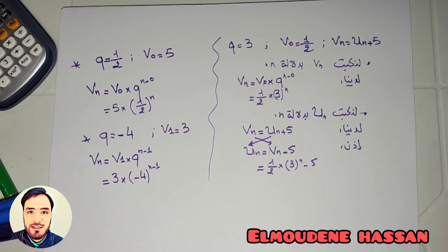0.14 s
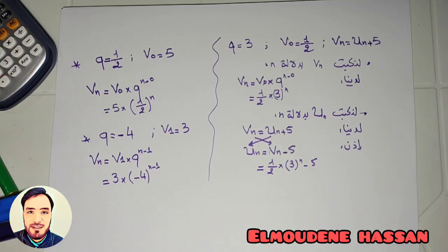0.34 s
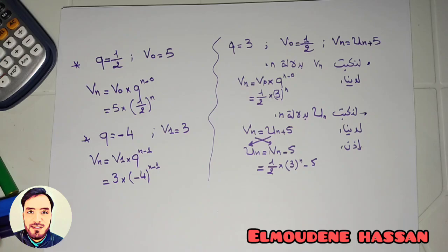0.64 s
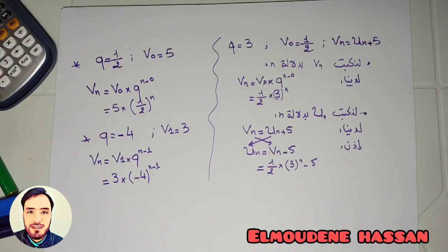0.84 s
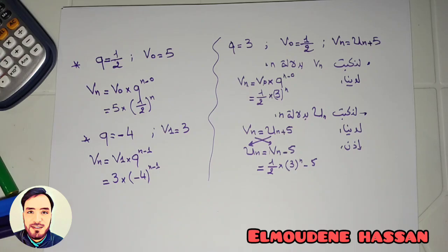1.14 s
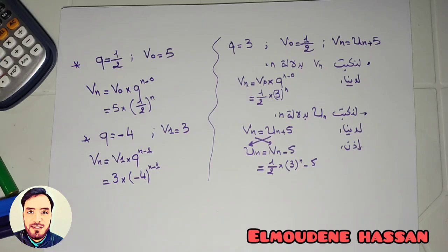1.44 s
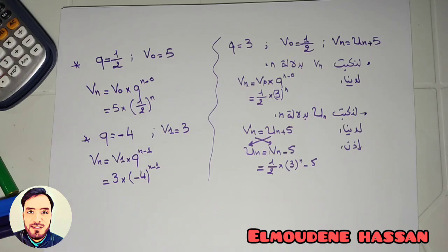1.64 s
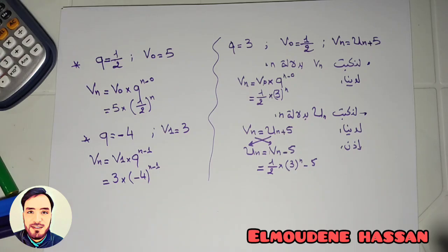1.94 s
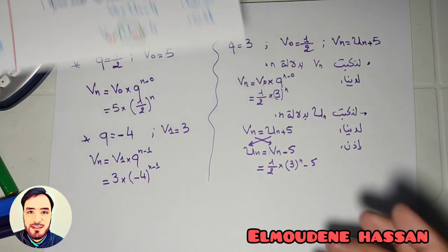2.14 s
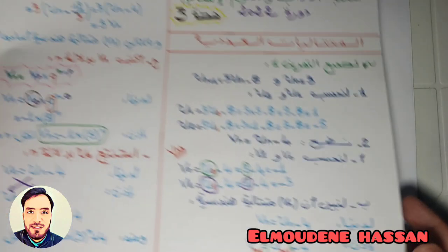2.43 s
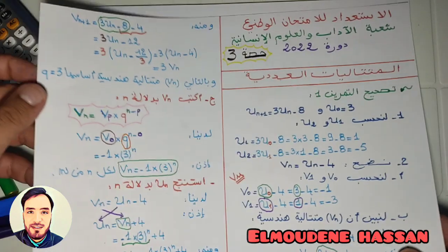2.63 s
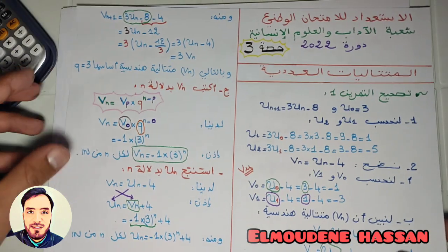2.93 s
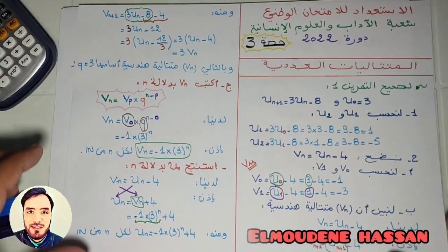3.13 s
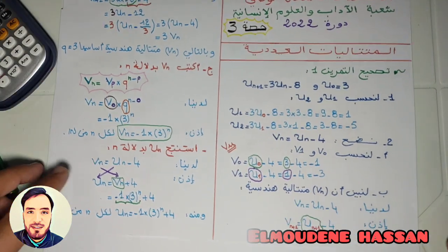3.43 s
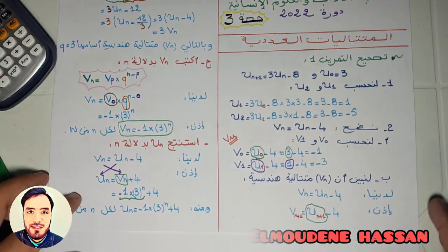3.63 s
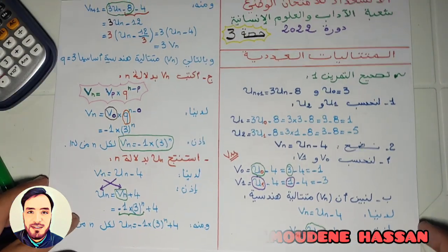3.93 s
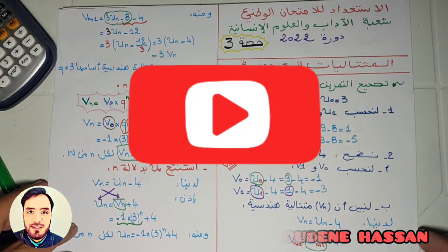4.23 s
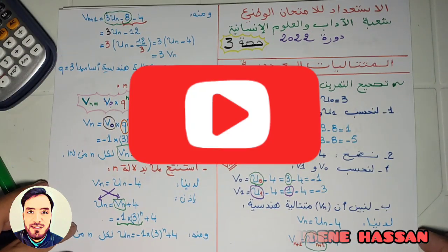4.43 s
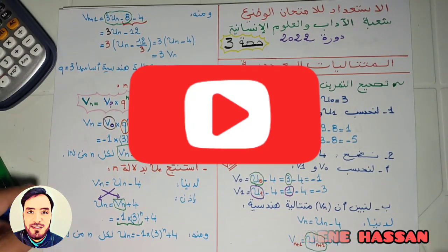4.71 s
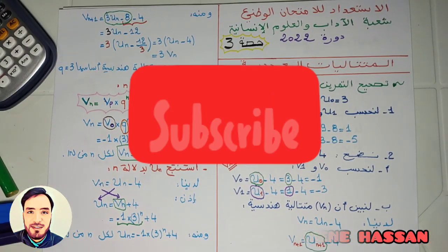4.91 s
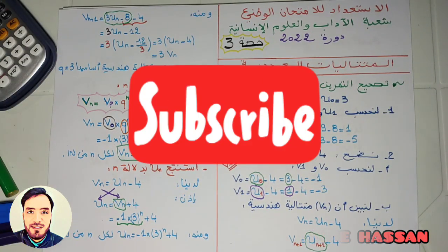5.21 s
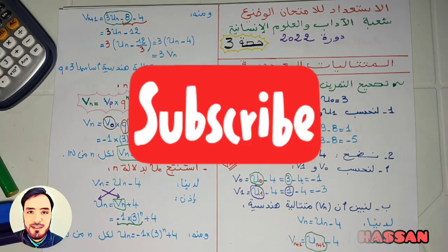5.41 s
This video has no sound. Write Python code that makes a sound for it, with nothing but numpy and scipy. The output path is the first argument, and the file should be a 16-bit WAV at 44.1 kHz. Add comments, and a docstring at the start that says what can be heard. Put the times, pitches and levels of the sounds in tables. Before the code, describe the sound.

In a small quiet room, a brief paper crinkle and soft desk bumps lead into a pen put down with two bright, hard clacks. After a near pause, a sheet is drawn off a pile in short crisp hisses, laid down and smoothed, with scattered ticks and light knocks. Close stereo phone microphone, faint rumble and hiss.

```python
"""Paper slides with a short hiss and crinkle in a small quiet room; then a pen is put down with two sharp clacks.
Hands bump the desk; a sheet is drawn off a pile, laid down and smoothed, its edges ticking.
Sliding paper is grainy coloured noise plus random pitched pops; its bending is slowly uneven low noise.
Ticks and clacks are flat noise bursts through resonances; desk blows are sums of decaying sine modes.
Echoes are decaying noise, drier for paper; a faint rumble and hiss run throughout."""
import sys
import numpy as np
from scipy import signal
from scipy.fft import rfft, irfft
from scipy.io import wavfile

SR = 44100
rng = np.random.default_rng(int(sys.argv[2]) if len(sys.argv) > 2 else 0)


def waveform_to_disk(signal):
    """Save audio, clipped to [-1, 1], as 16-bit WAV at the path in sys.argv[1]."""
    frames = np.transpose(np.atleast_2d(signal))
    scaled = np.clip(frames, -1, 1) * 32767
    samples = np.round(scaled).astype(np.int16)
    wavfile.write(sys.argv[1], SR, samples)


N = 245321
T_S = np.arange(N) / SR
BLOW_T_S = T_S[:4096]

# room background spectrum: f/Hz, relative level/dB
QUIET_COLOUR = [(15, 3.5), (25, -2.5), (42, -3.5), (60, -10), (100, -18.5), (190, -13), (457, -24),
                (555, -20), (889, -27.5), (3970, -41), (7510, -39.5), (8860, -39.5), (10000, -49.5),
                (12300, -48.5), (13400, -76)]
QUIET_REF_DB = -58.5  # before the gains of rumble and hiss

# paper sliding on paper: start/s, length/s, relative level/dB, swell over stroke/dB,
# sheet face re hiss/dB, lightness of touch/dB (scaled before use)
STROKES = [(0.0, 0.02, -57.5, -18.5, 18.5, -15), (0.037, 0.074, -68.5, -2.5, -12, -3),
           (1.001, 0.16, -72, -3, -10, -0.5), (1.151, 0.033, -60.5, 0, 2, 4),
           (1.197, 0.084, -62, -13, -5, -5), (1.513, .13, -53.5, 0.5, -4, 5),
           (1.656, 0.082, -57.5, 3, -3.5, -4), (1.775, 0.06, -61.5, 12, -7.5, -1),
           (1.825, 0.097, -48, -8, 0, 2), (1.914, 0.052, -50, 6.5, -4, 1.5),
           (2.561, 0.046, -48.5, -0.5, -7, -4), (2.613, 0.026, -52, 1, -3.5, -14),
           (2.661, 0.067, -59.5, 0.5, 3.5, -20), (2.737, 0.12, -55.5, -11, -7.5, -12),
           (2.847, 0.094, -58, -1, -4.5, -13.5), (3.038, 0.2, -65, -2.5, -6.5, -12.5),
           (3.259, 0.074, -72.5, 8.5, -7.5, -5.5), (3.502, 0.028, -70, 7, -4.5, 1),
           (3.674, 0.16, -63, 3, -15, 3.5), (3.879, 0.2, -67.5, 4, -9, -2),
           (4.237, 0.023, -71.5, 2.5, -4.5, 0.5), (5.179, 0.15, -52.5, -9, -9, 7.5),
           (5.36, 0.1, -68, 3, -6, 3)]
STROKE_ATTACK_S, STROKE_RELEASE_S = 0.02, 0.014
# sheet bends and flaps: start/s, length/s, relative level/dB, swell over flex/dB
FLEXES = [(0.0, 0.21, -50.5, -25), (0.201, 0.21, -61.5, 2), (1.168, 0.16, -61.5, -11.5),
          (1.537, 0.32, -70, 3), (1.828, 0.15, -49.5, -9), (2.009, 0.054, -57, -3),
          (2.552, 0.21, -63.5, -13), (5.16, 0.17, -67.5, -3.5)]
FLEX_ATTACK_S, FLEX_RELEASE_S = 0.02, 0.027
# fibre hiss spectrum: f/Hz, relative level/dB
HISS_COLOUR = [(2500, -21), (5000, -11.5), (6500, -3), (7700, 1.5), (9000, -3.5), (10000, -26),
               (13000, -28.5), (15500, -33.5)]
# light skim spectrum: f/Hz, relative level/dB
SKIM_COLOUR = [(5000, -22), (8500, 2), (11500, 3.5), (13000, -6), (15500, -2)]
# heavy drag spectrum: f/Hz, relative level/dB
DRAG_COLOUR = [(2500, -19.5), (4500, -6), (6000, -4), (7000, 1.5), (9500, -28.5)]
# sheet face spectrum: f/Hz, relative level/dB
FACE_COLOUR = [(400, -19), (1100, -0.5), (1700, -2.5), (2400, 1.5), (3300, 0.5), (4600, -2), (6500, -14),
               (10000, -35)]
# sheet bending spectrum: f/Hz, relative level/dB
BEND_COLOUR = [(90, -23), (190, -2), (320, -3.5), (430, -4), (650, 1), (900, -3), (1400, -10.5),
               (2500, -25), (5000, -47)]

# paper edges and nails, plus the ring of the desk knock at 2.25 s (row 2.2503 s): t/s, relative level/dB, #
# centre f/Hz, width per filter pass/Hz, contact time constant/s, left minus right/dB
TICKS = [(0.0165, -52.5, 7600, 2980, 0.00071, -7.5), (0.2127, -48, 3600, 8200, 0.00094, -3),
         (0.936, -50.5, 4800, 9000, 0.00063, 4), (1.1742, -44, 8000, 3950, 0.00045, -2),
         (2.2503, -45.5, 863, 450, 0.0008, -0.5), (2.58, -43, 7460, 3930, 0.001, -5),
         (2.7515, -46.5, 6840, 3040, 0.0022, -20), (2.9945, -53, 2380, 2250, 0.00089, 4),
         (3.4764, -58, 2580, 596, 0.00031, -5), (3.942, -48, 7500, 4030, 0.00092, -20),
         (3.944, -56, 2150, 2520, 0.002, -1), (4.668, -61, 2060, 2200, 0.004, -2),
         (4.6687, -54, 7380, 1985, 0.00057, -11.5), (4.9992, -64, 3160, 494, 0.00083, -10),
         (5.1337, -45.5, 8430, 3060, 0.0016, -4.5)]

# hands and sheets landing on the desk: t/s, level/dB, softness corner f/Hz, low cut f/Hz, left minus right/dB
KNOCKS = [(.019, -46, 2220, 300, 3), (.217, -50, 1810, 203, -2), (0.272, -47.5, 560, 278, 3),
          (0.339, -48, 1800, 200, 4), (0.625, -49, 1610, 249, 13), (1.1646, -39, 550, 238, 5.5),
          (1.175, -46.5, 2180, 800, 4), (1.419, -53.5, 552, 200, 7.5), (2.25, -50.5, 950, 1003, -6),
          (2.322, -53, 900, 889, 0.5), (2.5126, -59, 1480, 1026, -3), (2.589, -50, 1800, 1010, 15),
          (2.631, -53, 2100, 1110, 24), (2.676, -53.5, 1190, 895, -2), (2.9966, -60, 2400, 397, 10),
          (3.9455, -48.5, 3000, 262, 6), (4.671, -48, 2190, 280.5, 8), (5.241, -55, 163, 140, -1),
          (5.308, -57, 160, 140, 10)]
# desk top modes, nominal: f/Hz, relative level/dB, t60/s
DESK_MODES = [(165, -18, 0.24), (255.5, -16.5, .03), (352, 3.5, 0.018), (404.4, 1, 0.021),
              (567.3, 0, 0.022), (719.3, -2.5, .03), (863, -2.5, 0.028), (1139, -1.5, 0.029),
              (1270, -2.5, 0.014), (1700, -9, 0.027), (2336, -2, .008)]
# desk knock under each clack; level re the clack's table level
PEN_KNOCK_LAG_S, PEN_KNOCK_DB = 0.003, -14.5
PEN_SOFT_HZ, PEN_LOW_CUT_HZ, PEN_KNOCK_PAN_DB = 1550, 200.3, 7

# pen put down and bouncing: t/s, relative level/dB, contact time constant/s, relative tip ring/dB,
# barrel ring/dB, tip left minus right before a common offset/dB
CLACKS = [(0.336, -38.5, 0.00057, 1, -5, -14), (.3712, -16, 0.00065, 2, -5.5, -1),
          (0.391, -29.5, 0.00042, -5.5, -1, -2.5), (0.4237, -19.5, 0.00053, -2.5, -4.5, 3),
          (0.618, -49.5, 0.00074, 11.5, -7.5, -12.5)]
# clack spectrum: f/Hz, relative level/dB
CLACK_COLOUR = [(120, -17), (320, 0), (600, -9.5), (900, -1.5), (1180, 6.5), (1650, -4.5), (2500, -3.5),
                (4800, -3), (8600, -7.5), (9900, -15), (15000, -35)]
# pen barrel resonances: f/Hz, width/Hz, relative level/dB
BARREL_MODES = [(2138, 385, 3.5), (2750, 220, 7), (3580, 400, -4.5)]
# pen tip resonances: f/Hz, width/Hz, relative level/dB
TIP_MODES = [(6360, 660, 3), (7430, 340, 6.5), (7970, 1800, 0)]

# room decay: f/Hz, t60/s
ROOM_T60 = [(150, 0.28), (500, 0.3451), (1200, 0.39), (3000, 0.42), (8000, 0.34), (14000, 0.2)]
# echo spectrum: f/Hz, relative level/dB
ECHO_COLOUR = [(80, -18.5), (125, -14), (170, -2), (250, 1), (360, -2.5), (500, 2), (1000, -2.5),
               (2700, -2), (5500, -7.5), (8500, -3.5), (10500, -12)]
TOP_HZ = 15400


def undb(db):
    """Decibels to gain."""
    return np.exp(np.asarray(db) * np.log(10) / 20)


def unit(x):
    """Scale to rms 1."""
    return x / np.sqrt(np.mean(x ** 2))


def pan(db):
    """Left and right gains whose ratio is db."""
    return undb(np.array([[db], [-db]]) / 2)


def along(points, hz):
    """Interpolate (Hz, value) points on a log-frequency axis."""
    f, value = np.transpose(points)
    return np.interp(np.log(np.maximum(hz, 1)), np.log(f), value)


def colour(x, points, size=2048):
    """Minimum-phase filter with the given (Hz, dB) response."""
    gain = undb(along(points, np.fft.rfftfreq(size, 1 / SR)))
    cepstrum = irfft(np.log(gain))
    # fold the cepstrum onto positive time: causal response
    cepstrum[1:size // 2] *= 2
    cepstrum[size // 2 + 1:] = 0
    response = irfft(np.exp(rfft(cepstrum)))
    return signal.oaconvolve(x, response[None], axes=-1)[:, :x.shape[-1]]


def resonate(x, hz, width_hz):
    """One resonance, gain 1 at its centre."""
    b, a = signal.iirpeak(min(hz, SR / 3), hz / width_hz, fs=SR)
    return signal.lfilter(b, a, x)


def cut(x, hz, kind):
    """Second-order low-pass or high-pass."""
    return signal.sosfilt(signal.butter(2, hz, kind, fs=SR, output="sos"), x)


def ports(three, likeness):
    """Two microphone signals from one shared and two separate ones."""
    share = np.clip(likeness, 0, 1)
    return np.sqrt(share) * three[0] + np.sqrt(1 - share) * three[1:]


def add(out, start_s, sound, db, size):
    """Mix in a blow whose energy, spread over size samples, has the given level."""
    start = int(start_s * SR)
    sound = sound * undb(db) / np.sqrt(np.sum(sound ** 2) / (2 * size))
    out[:, start:start + sound.shape[1]] += sound[:, :N - start]


def quiet():
    """Low rumble of the building under a faint even hiss."""
    air = unit(colour(ports(rng.standard_normal((3, N)), likeness=0.15), QUIET_COLOUR, size=8192))
    rumble = cut(air, 640, "low") * pan(db=6) * undb(3.5)
    hiss = cut(air, 1300, "high") * pan(db=-1) * undb(1.44)
    return undb(QUIET_REF_DB) * (rumble - hiss)


def gesture(start_s, length_s, swell_db, attack_s, release_s):
    """Gain of one hand movement: gets going, swells or fades evenly in dB, then dies away."""
    age_s = T_S - start_s
    attack = np.clip(age_s / attack_s, 0, 1)
    swell = undb(swell_db * np.clip(age_s / length_s, 0, 1))
    release = np.exp(-np.clip((age_s - length_s) / release_s, 0, 20))
    return attack * swell * release


def friction(points, likeness, grain_db, catch_db, catch_hz):
    """Fibres snap past each other as dense uneven grains, while the sheet catches and slips."""
    grain_levels = np.repeat(rng.standard_normal(N // 16 + 1), 16)[:N]  # one level per 16 samples
    grains = rng.standard_normal((3, N)) * undb(grain_db * grain_levels)
    catches = np.interp(T_S * catch_hz, np.arange(N), rng.standard_normal(N))
    return unit(colour(ports(grains, likeness) * undb(catch_db * catches), points))


def crinkle(per_second, spread_db, t60_s, size=512):
    """Small buckles pop at random, each at its own pitch; a few are much louder than the rest."""
    draws = rng.random((int(per_second * N / SR), 4))
    when, chance, pitch, side = draws.T[:, :, None]
    hz = 800 * (7000 / 800) ** pitch
    loud = -np.log(1 - 0.97 * chance)  # capped exponential draw
    t_s = T_S[:size]
    pops = np.sin(2 * np.pi * hz * t_s) * undb(spread_db * loud - 60 * t_s / t60_s)
    places = ((when * (N - size)).astype(int) + np.arange(size)).ravel()
    left = np.bincount(places, (pops * np.sqrt(side)).ravel(), N)
    right = np.bincount(places, (pops * np.sqrt(1 - side)).ravel(), N)
    return unit(np.array([left, right]))


def paper():
    """Sliding hisses at the contact (light skims, heavy drags), crinkles at the face, flutters at bends."""
    fibres = friction(HISS_COLOUR, likeness=0.1, grain_db=2.0, catch_db=1.5, catch_hz=113.4)
    skim = friction(SKIM_COLOUR, likeness=0.22, grain_db=4.0, catch_db=1.0, catch_hz=110)
    drag = friction(DRAG_COLOUR, likeness=0.18, grain_db=3.5, catch_db=2.5, catch_hz=126.6)
    rub = friction(FACE_COLOUR, likeness=0.13, grain_db=4.0, catch_db=-1.0, catch_hz=90.4)
    flutter = friction(BEND_COLOUR, likeness=0.83, grain_db=0.5, catch_db=2.5, catch_hz=69.9)
    sliding, skimming, dragging, radiating = np.zeros((4, N))
    # overlapping strokes: the stronger one wins
    for start_s, length_s, db, swell_db, face_db, light_db in STROKES:
        gain = undb(db) * gesture(start_s, length_s, swell_db, STROKE_ATTACK_S, STROKE_RELEASE_S)
        sliding = np.maximum(sliding, gain)
        skimming = np.maximum(skimming, gain * undb(1.48 * light_db - 20.5))
        dragging = np.maximum(dragging, gain * undb(-light_db - 14))
        radiating = np.maximum(radiating, gain * undb(face_db))
    bending = np.zeros(N)
    for start_s, length_s, db, swell_db in FLEXES:
        bending += undb(db) * gesture(start_s, length_s, swell_db, FLEX_ATTACK_S, FLEX_RELEASE_S)
    hiss = fibres * sliding + skim * skimming + drag * dragging
    pops = crinkle(per_second=500, spread_db=5.0, t60_s=0.0079)
    face = (undb(-5.0) * rub + undb(-6) * pops) * radiating
    bend = flutter * bending
    return undb(-2.5) * hiss * pan(db=-4.5) + face * pan(db=-2.5) + bend * pan(db=5.0)


def contact(contact_s, likeness):
    """A hard contact: micro-impacts, even in spectrum, under a Gaussian fade set by the contact time."""
    noise = ports(rng.standard_normal((3, len(BLOW_T_S))), likeness)
    burst = noise * BLOW_T_S / contact_s * np.exp(-BLOW_T_S / contact_s)
    flat = irfft(np.exp(1j * np.angle(rfft(burst))))  # keep phase, flatten magnitude
    return flat * np.exp(-(BLOW_T_S / (10 * contact_s)) ** 2)


def ticks():
    """Paper edges flick and nails touch, and one desk knock rings: tiny contacts, each in one steep-sided
    resonance."""
    out = np.zeros((2, N))
    for start_s, db, hz, width_hz, contact_s, pan_db in TICKS:
        tick = contact(contact_s, likeness=0.2)
        for _ in range(2):
            tick = resonate(tick, hz, width_hz)
        tick = colour(tick, [(8800, -3), (10500, -20.5), (15000, -21)])
        add(out, start_s, tick * pan(pan_db), db - 0.5, size=128)
    return out


def desk():
    """Blows ring the desk top; soft hands swell slowly in low modes, light sheets excite only high ones."""
    out = np.zeros((2, N))
    pen_knocks = [(start_s + PEN_KNOCK_LAG_S, db + PEN_KNOCK_DB, PEN_SOFT_HZ, PEN_LOW_CUT_HZ, PEN_KNOCK_PAN_DB)
                  for start_s, db, *_ in CLACKS]
    for start_s, db, soft_hz, low_cut_hz, pan_db in pen_knocks + list(KNOCKS):
        ring = np.zeros((2, len(BLOW_T_S)))
        # each blow varies mode pitch, and mode level per port
        chance = rng.standard_normal((len(DESK_MODES), 3))
        for (hz, mode_db, t60_s), c in zip(DESK_MODES, chance):
            tone = np.sin(2 * np.pi * hz * (1 + 0.028 * c[0]) * BLOW_T_S)
            ring += undb(mode_db + 0.89 * c[1:, None]) * (undb(-60 * BLOW_T_S / t60_s) * tone)
        pushed = ring * (1 - np.exp(-BLOW_T_S * soft_hz / 1.65))
        cushioned = cut(cut(pushed, soft_hz, "low"), soft_hz, "low")
        add(out, start_s, cut(cushioned, low_cut_hz, "high") * pan(pan_db), db, size=256)
    return out


def ringing(x, modes):
    """A body's resonances driven by x."""
    return sum(undb(db) * resonate(x, hz, width_hz) for hz, width_hz, db in modes)


def pen():
    """Each clack cracks over a wide band and rings the barrel and the tip, which points to the right port."""
    out = np.zeros((2, N))
    for start_s, db, contact_s, tip_db, barrel_db, pan_db in CLACKS:
        crack = colour(contact(contact_s, likeness=0.43), CLACK_COLOUR)
        body = crack + undb(barrel_db) * ringing(crack, BARREL_MODES)
        tip = undb(tip_db) * ringing(crack, TIP_MODES)
        add(out, start_s, body * pan(db=4.5) + tip * pan(pan_db - 11.5), db + 0.5, size=128)
    return out


def echoes(build_s, size=32768):
    """The room's answer: echoes thicken over the first milliseconds, then decay at each octave's own rate."""
    t_s, hz = T_S[:size], np.fft.rfftfreq(size, 1 / SR)
    uneven_db = 2.5 * np.repeat(rng.standard_normal(size // 64), 64)
    noise = rng.standard_normal((3, size)) * undb(uneven_db)
    centres_hz = 125 * 2. ** np.arange(8)
    tail = 0
    for centre_hz, weights in zip(centres_hz, np.eye(len(centres_hz))):
        likeness = 1 / (1 + (centre_hz / 700) ** 2)  # ports differ more at high f
        band = irfft(rfft(ports(noise, likeness)) * along(np.c_[centres_hz, weights], hz))
        tail = tail + band * np.exp(-np.log(1000) * t_s / along(ROOM_T60, centre_hz))
    built = tail * (1 - np.exp(-t_s / build_s))
    return colour(unit(built) / np.sqrt(size), ECHO_COLOUR)


def room(x, wet_db, build_s):
    """Left and right sound take their own paths round the walls; one low standing wave hums on."""
    walls = sum(signal.fftconvolve(side[None], echoes(build_s), axes=-1)[:, :N] for side in x)
    standing = resonate(x.mean(axis=0), hz=154.2, width_hz=6)
    return undb(wet_db) * walls + undb(4) * standing * pan(db=-3.5)


def from_right(x, lag_s):
    """Sound from the right reaches the left port a little later."""
    left = np.pad(x[0], (int(lag_s * SR), 0))[:N]
    return np.array([left, x[1]])


def scene():
    """The pen lands off to the side, so the room answers it more than the paper under the microphone."""
    background, rustle, flicks, knocks, clacks = quiet(), paper(), ticks(), desk(), pen()
    send = clacks + undb(-1.0) * knocks + undb(-1.0) * flicks + undb(-1.5) * rustle
    echo = room(send, wet_db=-4.0, build_s=0.0013)
    return from_right(clacks + knocks + flicks + echo, lag_s=0.00032) + rustle + background


def record(dry):
    """The phone cuts the top: steep elliptic low-pass."""
    return signal.sosfilt(signal.ellip(8, 0.2, 70, TOP_HZ, fs=SR, output="sos"), dry)


dry = scene()
out = record(dry)
waveform_to_disk(out)
```